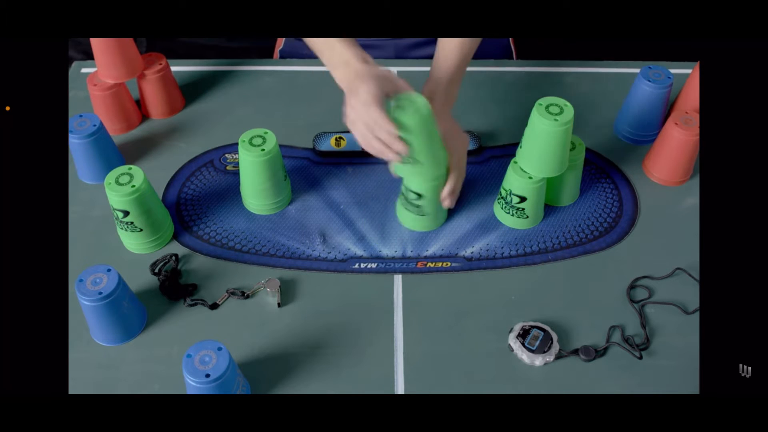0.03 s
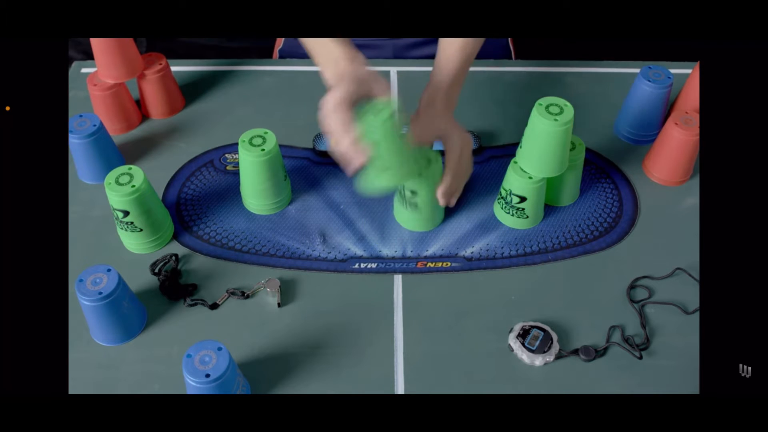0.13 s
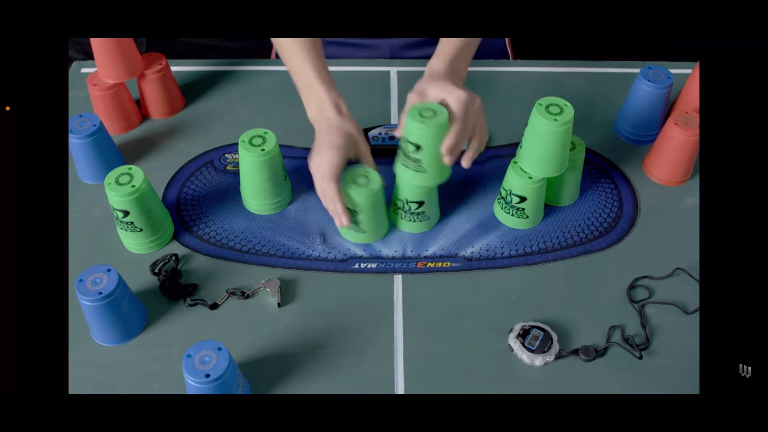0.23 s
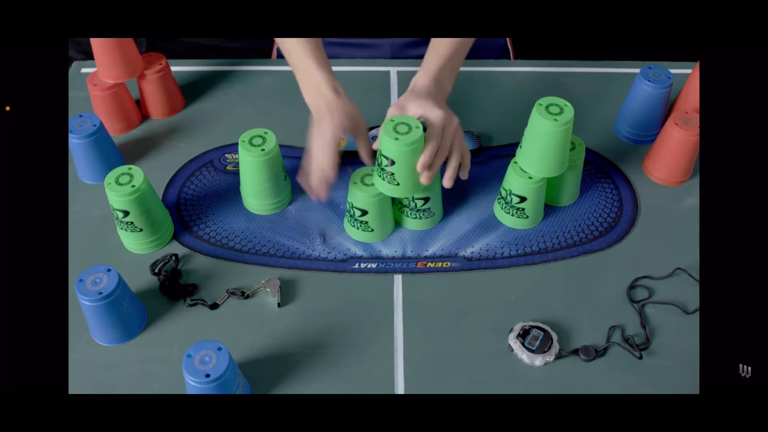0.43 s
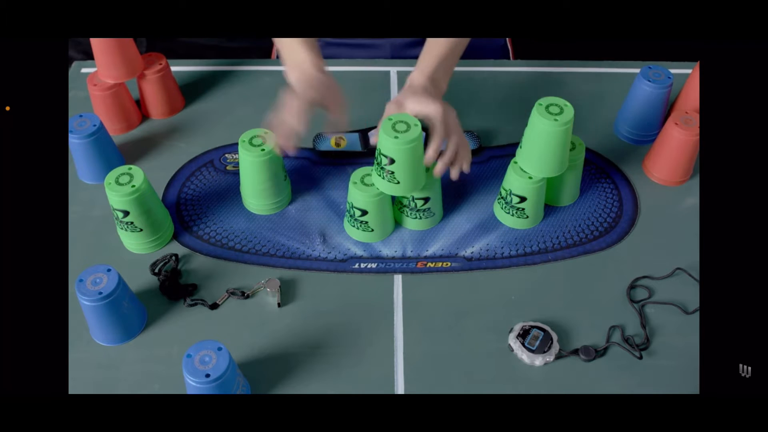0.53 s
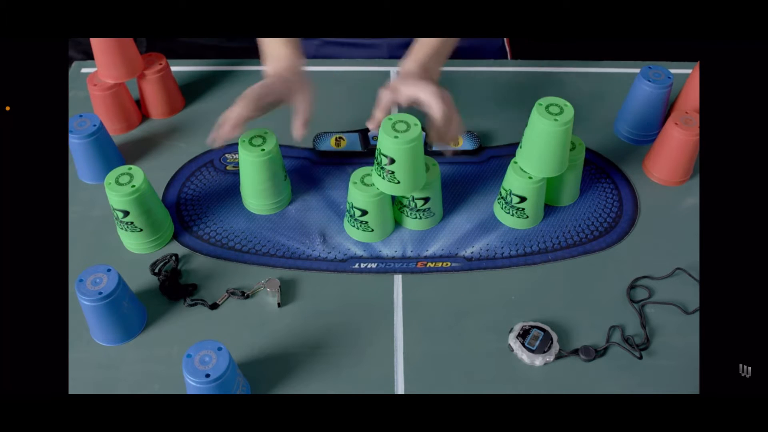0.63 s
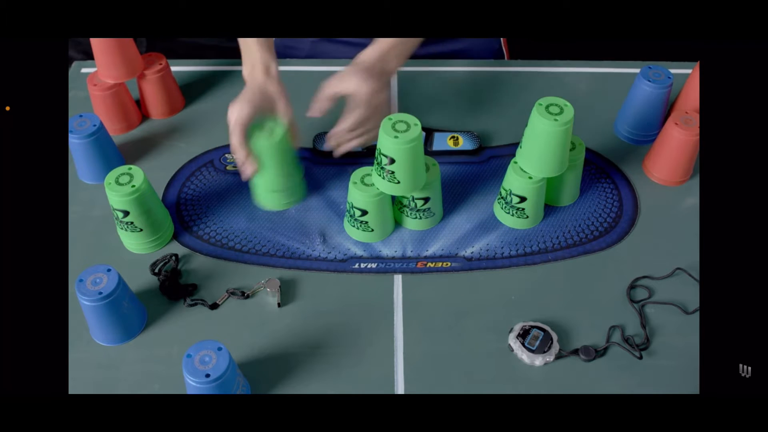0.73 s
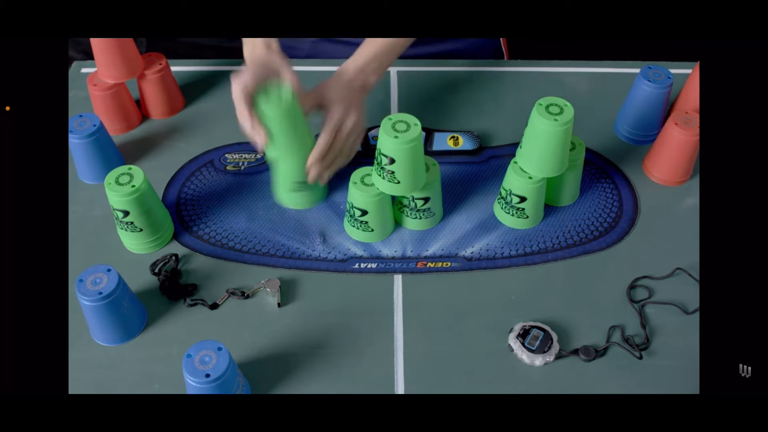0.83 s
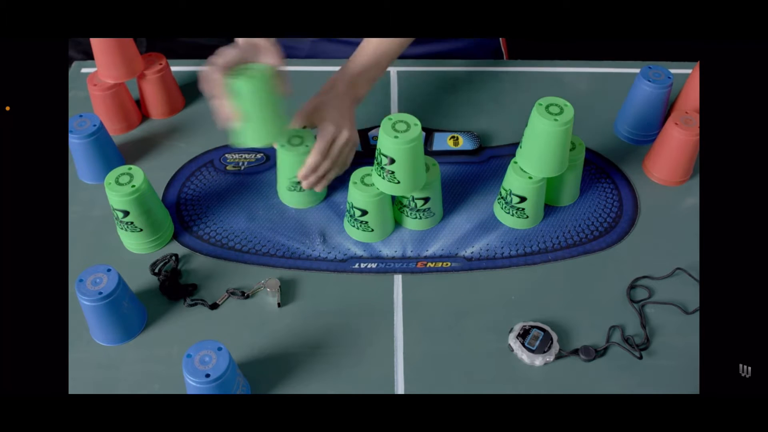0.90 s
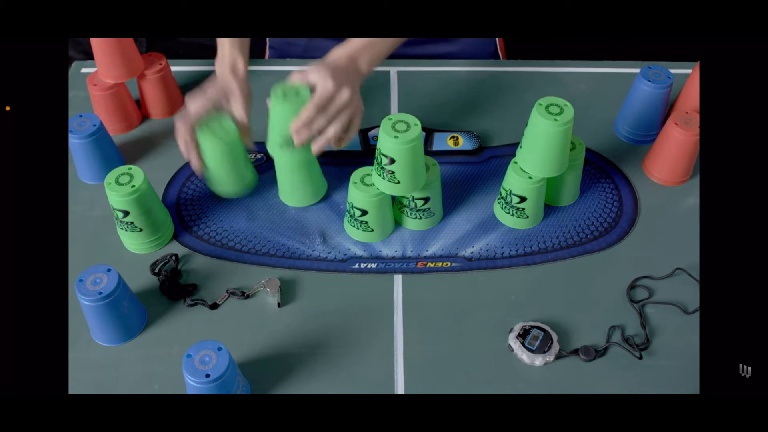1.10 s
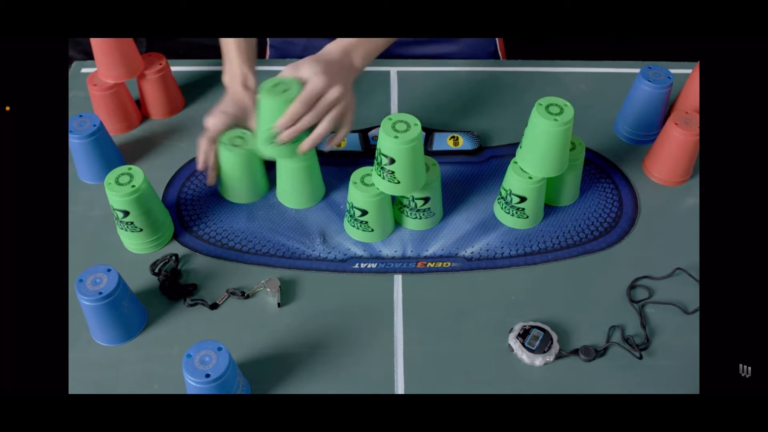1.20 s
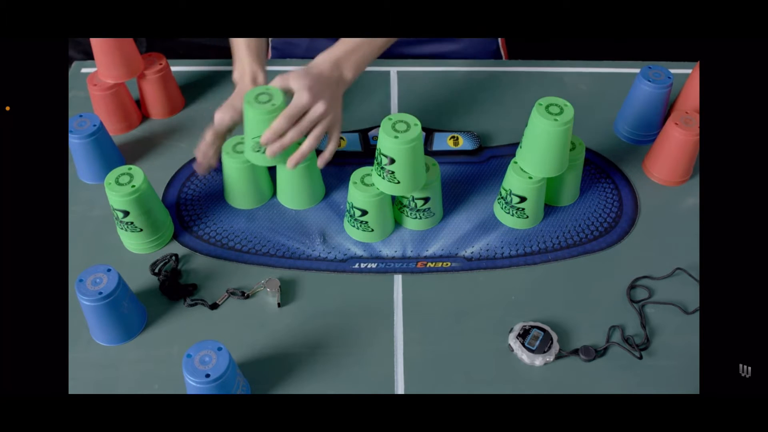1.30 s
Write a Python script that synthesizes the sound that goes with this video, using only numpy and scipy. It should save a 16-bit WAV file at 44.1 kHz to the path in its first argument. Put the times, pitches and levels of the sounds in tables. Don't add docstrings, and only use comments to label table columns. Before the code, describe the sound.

Hard plastic cups slide from a stack and clack down fast on a thinly matted table

```python
import sys
import numpy as np
from scipy import signal
from scipy.fft import rfft, irfft
from scipy.io import wavfile
from scipy.ndimage import uniform_filter1d

SR = 44100
rng = np.random.default_rng(int(sys.argv[2]) if len(sys.argv) > 2 else 0)


def file_out(sig):
    cols = np.atleast_2d(sig).T
    lim = np.clip(cols, -1, 1)
    pcm = np.round(lim * 32767).astype(np.int16)
    wavfile.write(sys.argv[1], SR, pcm)


def magnitude_from_level(level_db):
    exponent = np.asarray(level_db, float) / 20
    return 10 ** exponent


N = 59535

# pitch_hz, level_db (per Hz)
RUMBLE_COLOUR = [(22, -10), (48, 8.5), (425, -6), (807, -16.5), (1080, -18), (3060, -28.5), (5000, -36.5),
                 (8000, -47.5)]
# pitch_hz, t60_s, level_db
ROOM_BANDS = [(97, 0.21, -35), (154.6, 0.44, -17), (405, 0.31, -24.5), (529, 0.6, -29.5),
              (850, 0.28, -28.5), (1364, 0.46, -27.5), (2900, 0.41, -30.5), (4630, 0.2, -25),
              (7300, 0.22, -26.5)]
# pitch_hz, level_db, t60_s
ROOM_MODES = [(105.9, -62, 0.48), (385, -69.5, .5), (414, -72.5, .6), (455, -72.5, .55), (479, -73.5, 0.56),
              (548, -71, 0.42), (582, -74.5, .55), (1007, -74.5, .4), (1080, -74.5, .33)]

# pitch_hz, t60_s
TABLE_MODES = [(40, 0.022), (74, 0.063), (139, 0.16), (225, 0.11)]
# start_s, then level_db of each table mode, low to high
THUMPS = [(0.042, -24.5, -28.5, -31.5, -46.5), (0.217, -47, -14, -23, -26.5),
          (0.2544, -58, -14.5, -20.5, -23.5), (0.431, -33.5, -32.5, -45.5, -65),
          (0.496, -45.5, -41, -21.5, -30.5), (0.519, -54, -20, -58, -51), (0.589, -58, -16.5, -53, -41.5),
          (0.613, -37, -46, -24, -20.5), (0.859, -25.5, -52, -65.5, -83), (0.93, -24.5, -30, -53, -44.5),
          (1.032, -49.5, -48, -67, -65), (1.099, -55, -29, -34.5, -22.5), (1.313, -56, -39, -51.5, -54)]

# time_s, level_db
SLIDES = [
    [(.115, -68), (.12, -54), (.145, -47.5), (.163, -51), (.178, -43), (.19, -39.5), (.197, -66.5),
     (.214, -38.5)],
    [(.895, -84), (.922, -54), (.945, -66), (.971, -61), (.983, -73), (.992, -60)],
    [(.992, -70), (.997, -54), (1.02, -52), (1.038, -49), (1.049, -51.5), (1.062, -58), (1.075, -89),
     (1.092, -57)],
]
# pitch_hz, level_db (per Hz)
SCRAPE_COLOUR = [(410, -36), (700, -11), (2700, -6.5), (3020, -2.5), (4950, -8), (6670, -11), (7710, -11),
                 (8200, -54.5), (10700, -61), (18000, -120)]
WALL_HZ = [1290, 2090, 2700, 3430, 4240, 5200, 6540, 6770, 7100]
# start_s, length_s, level_db, pitch_hz
CATCHES = [(0.116, 0.031, -53, 1950), (0.124, .01, -48.5, 5750), (0.135, 0.0097, -50, 2000),
           (.146, .01, -44, 2500), (0.143, .012, -52, 1550), (0.145, 0.029, -48, 6700),
           (0.151, 0.02, -44, 2500), (0.163, 0.005, -41, 3900), (0.485, .008, -55.5, 2600),
           (0.494, 0.019, -48.5, 3140), (.497, 0.021, -57, 5360), (0.516, 0.013, -51, 7080),
           (0.514, 0.015, -52, 3000), (.555, 0.016, -62.5, 2500), (.998, .01, -54.5, 5200),
           (1.013, .014, -54.5, 2080), (1.022, 0.022, -45, 3080), (1.031, 0.018, -45, 2500),
           (1.032, 0.024, -44, 3960), (1.03, 0.016, -56.5, 1570), (1.05, 0.017, -38.5, 3190),
           (1.051, 0.013, -38.5, 2190), (1.094, 0.01, -53, 3870)]

# start_s, level_db, centre_hz, t60_s
TICKS = [(0.035, -38, 5250, 0.025), (.149, -55.5, 2760, 0.03), (0.169, -48, 3950, 0.02),
         (0.1745, -29, 3510, 0.0071), (0.1818, -35, 5070, 0.018), (0.183, -22, 2900, 0.016),
         (0.187, -31, 2600, 0.043), (0.271, -44, 2000, 0.024), (0.21, -36.5, 2500, 0.024),
         (0.397, -61.5, 2700, 0.062), (0.425, -74.5, 5330, 0.0055), (0.925, -40.5, 3900, 0.017),
         (1.0525, -43, 3050, 0.0041), (1.055, -36, 2350, 0.04), (1.054, -32.5, 3300, 0.027),
         (1.0698, -42, 1630, 0.013), (1.048, -40.5, 1230, 0.014), (1.296, -63, 4960, 0.0038),
         (1.275, -64.5, 2000, 0.26), (1.319, -58, 2100, 0.038)]
# start_s, level_db, pitch_hz, t60_s
KNOCKS = [(.044, -34, 756, 0.039), (.929, -44.5, 686, 0.065), (0.2172, -24.5, 5950, 0.012),
          (0.1494, -32.5, 2900, .008), (0.1741, -29.5, 3900, 0.0057), (0.1807, -28, 4400, .008),
          (0.18, -36.5, 6820, 0.021), (0.1816, -25, 1500, 0.006), (0.1829, -22, 2900, 0.0086),
          (.2166, -28.5, 3700, .006), (0.223, -32, 3180, .025), (0.493, -19, 2600, 0.0044),
          (0.4942, -33, 4100, 0.0048), (0.5121, -32.5, 6000, .006), (.512, -33.5, 4200, .015),
          (0.5822, -21, 3240, .01), (.5935, -22.5, 2110, .012), (1.0479, -32, 1700, .01),
          (1.0523, -22.5, 3800, 0.0045), (1.0526, -22.5, 2170, 0.0069), (1.0696, -32, 1650, 0.0048)]

# pitch_hz, level_db, t60_s
ON_MAT = [(542, -3.5, 0.026), (871, 6.5, 0.022), (949, -8.5, 0.038), (1104, -28.5, 0.071),
          (1550, -39.5, 0.048), (1958, -9.5, 0.023), (3030, -35.5, 0.04), (3910, -39.5, 0.021)]
LAST_ON_MAT = [(439, -14, 0.1), (798, -11, 0.085), (877, 10.5, 0.016), (926, -27, 0.019), (1140, -14, 0.11),
               (1305, 0, 0.027), (1400, -4, 0.022), (2000, -16.5, 0.058), (2346, -11, 0.027),
               (3040, -29, 0.019), (3860, -29, 0.023)]
STACK = [(542, 0, 0.034), (970, 2, 0.015), (1810, -22.5, 0.075)]
ON_CUPS = [(398.6, 1.5, 0.028), (438, 5, 0.051), (501, 2.5, 0.041), (640, -11.5, 0.031), (840, -8.5, 0.03),
           (1070, -12, 0.031), (2100, -11, 0.024), (2500, -21, 0.045), (3107, -14.5, 0.023),
           (3830, -25.5, 0.048)]
HELD = [(259.3, 8.5, 0.022), (466, -5, 0.019), (367, -1, 0.019), (720, -19, 0.027), (1060, -23.5, 0.034),
        (1646, -32, 0.062), (2600, -16, .01)]

# (crack, per octave above 3 kHz)
MAT_HITS = [
    (0.2163, -28, -24, 0.0011, 1),
    (0.2179, 1, -25.5, 0.0056, 2.5),
    (0.2519, -25.5, -45.5, 0.0036, -10.5),
    (0.271, -46.5, -44.5, 0.00091, 3.5),
]
LAST_HITS = [
    (1.0933, -12.5, -23.5, 0.0029, -0.58),
    (1.0968, -21, -27.5, 0.0016, -1.3),
]
STACK_HITS = [
    (0.0439, -25, -38, 0.0019, -0.79),
    (0.928, -45.5, -44.5, 0.0018, -1.4),
]
CUP_HITS = [
    (0.1825, -35.5, -56.5, 0.0075, 2.5),
    (.578, -11, -25.5, 0.0053, -6),
    (0.5801, -25, -26.5, 0.00033, 0.5),
    (.585, -18.5, -29.5, 0.001, -6.5),
    (0.5893, -34, -34, 0.0018, 0.5),
    (0.5929, -9, -24, 0.0014, -0.5),
    (.598, -19.5, -28.5, 0.0012, 1.5),
    (0.6033, -23, -44, 0.00035, -20),
    (0.6117, -26.5, -37.5, .001, -14.5),
]
HELD_HITS = [
    (.4924, -26, -33, .0008, -14),
    (.4944, -6, -36, .003, -1),
    (.5113, -30, -40, .001, 0),
    (1.102, -26, -42, .002, -6),
]
# pitch_hz, level_db (per Hz)
CRACK_COLOUR = [(300, 12), (1500, 7.5), (3000, 8), (5000, 1), (8200, -9.5)]

CONTACT_S = 0.0004


def unit(x):
    return x / np.sqrt(np.mean(x ** 2))


def colour(x, points):
    hz, db = np.array(points, float).T
    f = np.arange(len(x) // 2 + 1) * SR / len(x) + 1
    gain = magnitude_from_level(np.interp(np.log(f), np.log(hz), db))
    return irfft(rfft(x) * gain, len(x))


def fade(t, t60):
    return np.exp(-np.log(1000) * t / max(t60, 0.002))


def swell_in(t, swell):
    return 1 - np.exp(-t / swell)


def add(out, start, x):
    i = int(start * SR)
    out[i:i + len(x)] += x[:N - i]


def walk(rate):
    hold = int(SR / rate)
    levels = rng.standard_normal(N // hold + 1)
    return uniform_filter1d(np.repeat(levels, hold), hold)[:N]


def narrow_band(x, hz, width):
    edges = [hz * (1 - width / 2), hz * (1 + width / 2)]
    return signal.sosfilt(signal.butter(1, edges, "band", fs=SR, output="sos"), x)


def ring(modes, swell, scatter_db):
    t = np.arange(SR // 2) / SR
    y = np.zeros(len(t))
    for hz, db, t60 in modes:
        level_luck, pitch_luck = rng.standard_normal(2)
        pitch = hz * (1 + 0.006 * pitch_luck)
        y += magnitude_from_level(db + scatter_db * level_luck) * fade(t, t60) * np.sin(2 * np.pi * pitch * t)
    return y * swell_in(t, max(swell, 1e-4))


def hum():
    level_db = -52 + 1.5 * walk(11.0)
    return unit(colour(rng.standard_normal(N), RUMBLE_COLOUR)) * magnitude_from_level(level_db)


def room():
    gap_s, rise_s = 0.015, 0.0019
    t = np.arange(SR) / SR
    rise = swell_in(np.clip(t - gap_s, 0, None), rise_s)
    tail, modes = np.zeros(SR), np.zeros(SR)
    for hz, t60, db in ROOM_BANDS:
        edges = [hz / 1.41, min(hz * 1.41, 12000)]
        sos = signal.butter(2, edges, "band", fs=SR, output="sos")
        band = signal.sosfilt(sos, rng.standard_normal(SR))
        tail += magnitude_from_level(db) * band * fade(t, t60) * rise
    for hz, db, t60 in ROOM_MODES:
        modes += magnitude_from_level(db) * fade(t, t60) * np.sin(2 * np.pi * hz * t)
    return tail * 0.16 + modes * rise


def table():
    edge_hz, edge_t60_s, edge_db = 310, 0.35, -16
    out = np.zeros(N)
    for start, *levels in THUMPS:
        modes = [(hz, db, t60) for (hz, t60), db in zip(TABLE_MODES, levels)]
        modes.append((edge_hz, levels[-1] + edge_db, edge_t60_s))
        add(out, start, ring(modes, swell=0.0015, scatter_db=-2.5))
    return out


def slides():
    grains_per_s, spread_db, trim_db = 11000, 3.23, 1.5
    patch_per_s, patch_db = 90, 5
    t = np.arange(N) / SR
    chance, side, size = rng.random((3, N))
    grains = (chance < grains_per_s / SR) * np.sign(side - 0.5)
    grains = grains * magnitude_from_level(-spread_db * np.log(size + 1e-6))
    grains = colour(grains, SCRAPE_COLOUR)
    walls, env = np.zeros(N), np.zeros(N)
    for hz in WALL_HZ:
        walls += narrow_band(grains, hz, width=0.081) * magnitude_from_level(patch_db * walk(patch_per_s))
    for curve in SLIDES:
        time_s, level_db = np.array(curve).T
        env += magnitude_from_level(np.interp(t, time_s, level_db, left=-120, right=-120))
    return unit(walls) * env * magnitude_from_level(trim_db)


def catches():
    out = np.zeros(N)
    for start, length, db, hz in CATCHES:
        noise = rng.standard_normal(2048)
        rasp = unit(narrow_band(noise, hz, width=0.053))[512:]
        share = np.clip(np.arange(len(rasp)) / SR / length, 0, 1)
        add(out, start, magnitude_from_level(db) * rasp * np.sin(np.pi * share))
    return out


def ticks():
    ratios, levels = [1 / 4, 2 / 3, 1, 3 / 2, 3], [-19, -8, 0, -8, -26]
    out, t = np.zeros(N), np.arange(4096) / SR
    for start, db, hz, t60 in TICKS:
        shape = list(zip(np.array(ratios) * hz, levels))
        burst = unit(colour(rng.standard_normal(len(t)), shape))
        add(out, start, magnitude_from_level(db) * burst * fade(t, t60) * swell_in(t, CONTACT_S))
    return out


def knocks():
    out, t = np.zeros(N), np.arange(4096) / SR
    for start, db, hz, t60 in KNOCKS:
        add(out, start, magnitude_from_level(db) * fade(t, t60) * np.sin(2 * np.pi * hz * t))
    return out


def crack(tilt_db):
    t = np.arange(4096) / SR
    shape = [(hz, db + tilt_db * max(np.log2(hz / 3000), 0)) for hz, db in CRACK_COLOUR]
    noise = unit(colour(rng.standard_normal(len(t)), shape))
    body, snap = fade(t, 0.034), magnitude_from_level(-2) * fade(t, 0.007)
    return noise * (body + snap) * swell_in(t, CONTACT_S)


def landings():
    out = np.zeros(N)
    kinds = [(ON_MAT, MAT_HITS), (LAST_ON_MAT, LAST_HITS), (STACK, STACK_HITS),
             (ON_CUPS, CUP_HITS), (HELD, HELD_HITS)]
    for modes, hits in kinds:
        for start, ring_db, crack_db, swell, tilt_db in hits:
            add(out, start, magnitude_from_level(ring_db) * ring(modes, swell, scatter_db=2.13))
            add(out, start, magnitude_from_level(crack_db) * crack(tilt_db))
    return out


def scene():
    floor, tail, boom = hum(), room(), table()
    cups = slides() + catches() + ticks() + knocks() + landings()
    mic_low_cut = signal.butter(2, 55, "high", fs=SR, output="sos")
    near = signal.sosfilt(mic_low_cut, cups + boom)
    echo = signal.fftconvolve(cups + magnitude_from_level(-4.0) * boom, tail)[:N]
    return (near + echo + floor)[None]


def top_cut(x):
    return signal.sosfilt(signal.butter(12, 8890, fs=SR, output="sos"), x)


def record(dry):
    treble_cut = signal.ellip(10, 0.3, 75, 8000, fs=SR, output="sos")
    mix = signal.sosfilt(treble_cut, dry)
    return top_cut(mix)


dry = scene()
out = record(dry)
file_out(out)
```